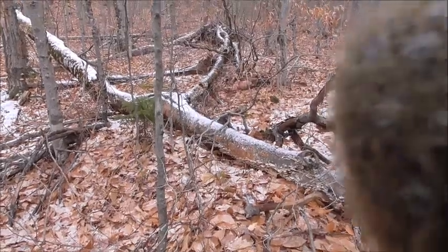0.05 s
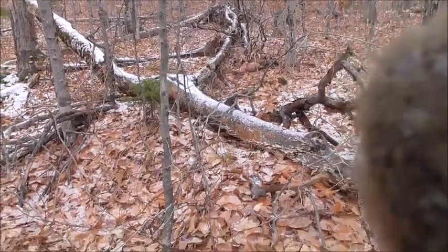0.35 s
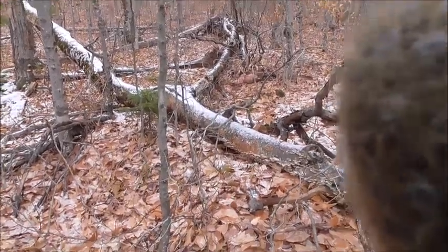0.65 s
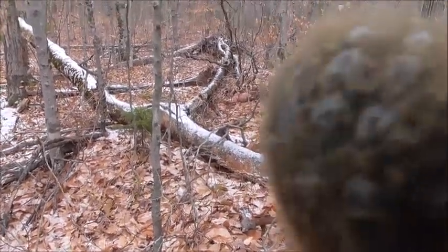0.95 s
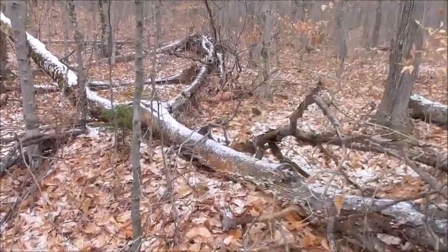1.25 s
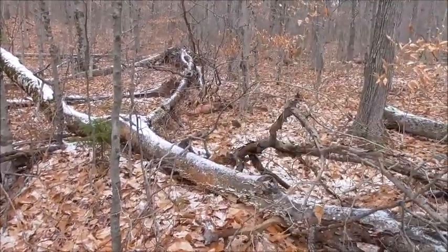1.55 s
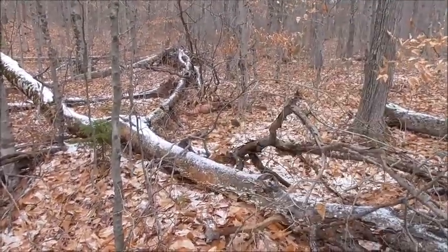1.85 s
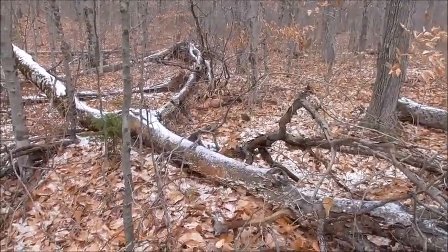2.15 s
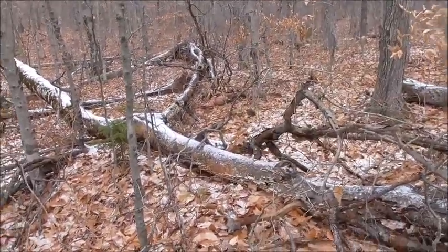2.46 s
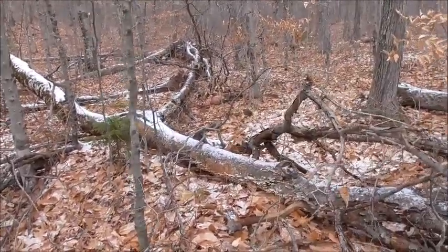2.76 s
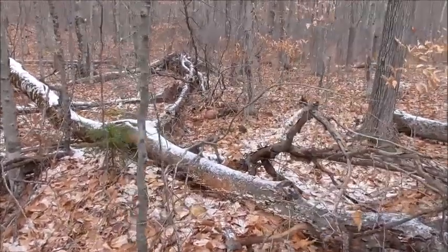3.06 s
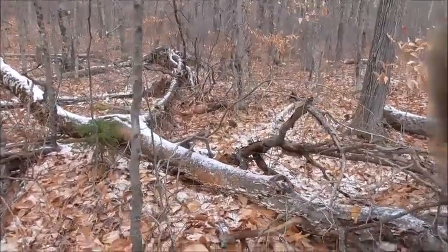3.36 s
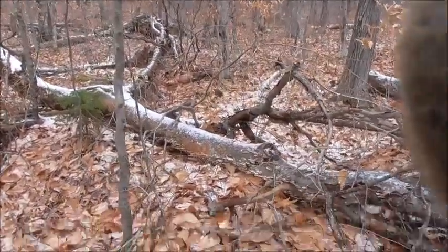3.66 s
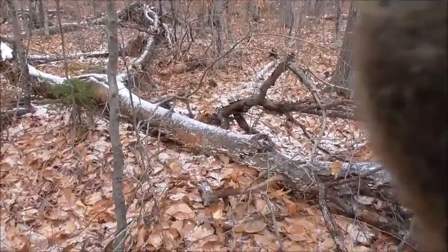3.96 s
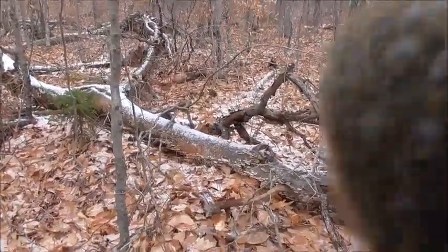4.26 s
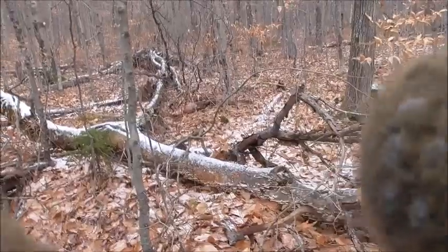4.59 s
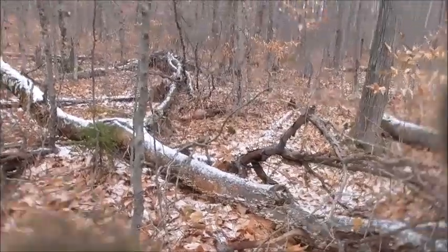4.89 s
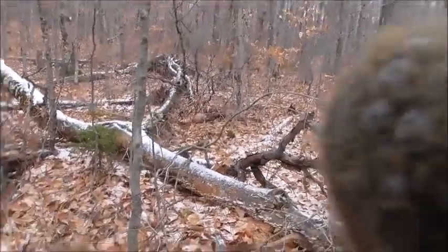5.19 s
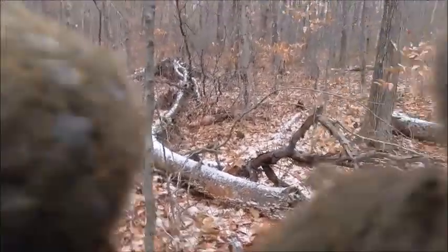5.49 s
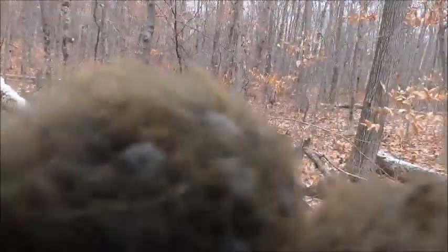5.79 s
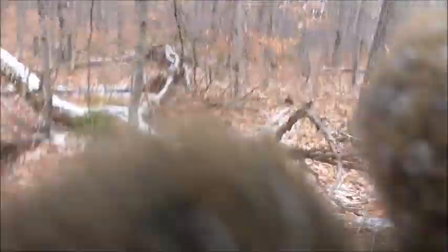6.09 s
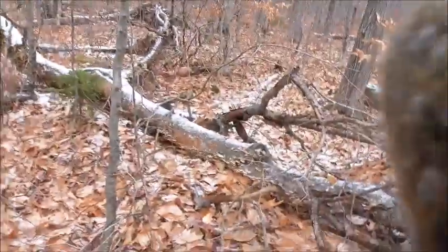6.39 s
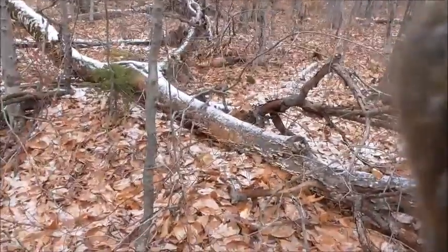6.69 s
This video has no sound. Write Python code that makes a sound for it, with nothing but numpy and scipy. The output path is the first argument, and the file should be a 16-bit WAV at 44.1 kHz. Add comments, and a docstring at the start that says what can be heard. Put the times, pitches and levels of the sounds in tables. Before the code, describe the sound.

A knitted glove and sleeve rub directly on a camera's microphones, shifting between left and right, over a faint, steady murmur of air in still woods. Soft brushes and tiny ticks open, with a brief hissy swish at about 0.9 seconds and a scuff with crisp ticks around 1.3 to 1.5 seconds. After a quieter stretch, a sharp scrape on the left and a click arrive at 3 seconds. Low, muffled rubbing follows, with a dull knock at 4 seconds. From about 4.3 seconds the handling becomes louder and nearly continuous, with rasping strokes of yarn and a hollow rumble. A bright snap and a hard knock on the housing come at around 5.6 seconds. Another strong scuff with a bump follows near 6.2 seconds, then the rubbing eases to light brushing and a last tick just before 7 seconds.

```python
"""Glove on a camera in a winter wood

A knitted glove and sleeve keep brushing a camera carried through still woods, right at its microphones.
Sliding cloth hisses; where it presses on the housing it scrapes and rumbles, pushing the two microphone
ports against each other. Snagged fibres tick, the housing takes a few knocks, and distant air murmurs."""
import sys
import numpy as np
from scipy import signal
from scipy.fft import rfft, irfft, next_fast_len
from scipy.io import wavfile
from scipy.ndimage import uniform_filter1d, map_coordinates

SR = 44100
rng = np.random.default_rng(int(sys.argv[2]) if len(sys.argv) > 2 else 0)


def int16_out(signal):
    """Quantize to a 16-bit WAV file."""
    q = np.round(np.clip(np.atleast_2d(signal).T, -1, 1) * 32767)
    wavfile.write(sys.argv[1], SR, q.astype(np.int16))


N = 301540


def amp(db):
    """Decibels to gain."""
    return 10 ** (np.asarray(db) / 20)


def unit(x):
    """x at rms 1."""
    return x / np.sqrt(np.mean(x ** 2) + 1e-20)


def along(points, hz):
    """(frequency, value) points read on a log axis."""
    freqs, values = np.transpose(points)
    return np.interp(np.log(hz + 1), np.log(freqs + 1), values)


def per_sample(times, values):
    """Join timed values into one value per sample."""
    return np.interp(np.arange(N) / SR, times, values)


def wobble(rate):
    """A smooth random curve, rate knots a second."""
    t = np.arange(0, N / SR, .001)
    knots = rng.standard_normal(int(N * rate / SR) + 4)
    return per_sample(t, map_coordinates(knots, [t * rate]))


def filtered(x, response):
    """x shaped by a gain that depends on frequency."""
    n = x.shape[-1]
    padded = next_fast_len(n + 8192)
    return irfft(rfft(x, padded) * response(np.fft.rfftfreq(padded, 1 / SR)), padded)[..., :n]


def panned(pan_db):
    """Left and right gains of constant power; positive is toward the left microphone."""
    gains = amp(np.array([pan_db, -pan_db]).reshape(2, -1) / 2)
    return gains / np.sqrt(np.mean(gains ** 2, axis=0))


def ports(pair, spectrum, correlation):
    """Two unrelated signals become a coloured stereo pair at the microphone ports, its mid at rms 1."""
    def response(hz):
        angle = np.arccos(np.clip(along(correlation, hz), -1, 1)) / 2
        return amp(along(spectrum, hz)) * [np.cos(angle), np.sin(angle)]
    mid, side = filtered(pair, response)
    return np.array([mid + side, mid - side]) / np.std(mid)


def patchy(pair, depth_db):
    """The colour drifts in patches as folds of cloth open and close small cavities."""
    spectra = signal.stft(pair, nperseg=512)[2]
    bands = uniform_filter1d(rng.standard_normal(spectra.shape), size=7, axis=1)
    patches = unit(uniform_filter1d(bands, size=12, axis=2))
    return signal.istft(spectra * amp(depth_db * patches), nperseg=512)[1][:, :N]


def slips(rate, spread_db):
    """Fibres catch and let go: random impulses of uneven size, rate a second at each port."""
    chance = np.clip(rate / SR, 1e-4, 1)
    fired = rng.random((2, N)) < chance
    sizes = rng.standard_normal((2, N)) * amp(spread_db * rng.standard_normal((2, N)))
    return unit(fired * sizes / np.sqrt(chance))


def add(track, start_s, sound):
    """Mix a sound in at start_s."""
    part = track[:, round(start_s * SR):][:, :sound.shape[1]]
    part += sound[:, :part.shape[1]]


# Air far off among the trees: (frequency [Hz], relative level [dB])
AIR_SPECTRUM = [(12, -60), (20, -32), (107, -9.5), (142, -5), (241, 0.5), (337, -4.5), (367, -5),
                (410, -6.5), (590, -7.5), (1660, -28), (1910, -35.5), (4060, -31.5), (6720, -37),
                (9950, -34), (16000, -60)]
# How alike it reaches the two microphones: (frequency [Hz], correlation [-1..1])
AIR_CORRELATION = [(50, 0.72), (200, 1), (700, 1), (1500, 0.62), (4000, 0.92), (12000, .1)]


def distant_air(level_db=-46.5):
    """A steady low murmur from deep in the wood, nearly alike at both microphones."""
    drift_db = .4 * wobble(3)
    murmur = ports(rng.standard_normal((2, N)), AIR_SPECTRUM, AIR_CORRELATION)
    return murmur * amp(level_db + drift_db) * panned(-2.0)


# Resonances rung by knocks on the housing that holds the microphones:
# (time [s], level [dB], pitch [Hz], t60 [s], left over right [dB])
KNOCK_RESONANCES = [(.945, -27, 175, 0.03, -20), (1.338, -27.5, 252, 0.037, -4),
                    (3.045, -21, 535, 0.025, -1), (3.045, -37.5, 2130, .023, 5),
                    (3.527, -31, 355, 0.093, -13), (3.622, -25, 310, 0.075, -17),
                    (3.982, -12, 195, 0.024, -4), (3.983, -20.5, 566, 0.015, -7),
                    (4.487, -20.5, 237, 0.037, 1), (5.6378, -4, 930, .016, -4.5),
                    (5.6442, -8, 865, 0.02, 1), (5.652, -23.5, 813, 0.071, -8),
                    (5.286, -20.5, 97, 0.044, -4), (6.198, -15, 84, 0.047, -14),
                    (6.216, -13.5, 151, 0.034, -13), (6.2705, -3, 218, 0.016, 14)]


def knocks(rise_cycles=0.57, roughness=0.17, port_phase_rad=1.63):
    """Each row rings one damped resonance; some knocks sound a low and a higher one together."""
    track, t = np.zeros((2, N)), np.arange(SR // 10) / SR
    # the pitch is high for a hard contact, low through the padded glove
    for start_s, db, hz, t60, pan_db in KNOCK_RESONANCES:
        grit = unit(filtered(rng.standard_normal((2, len(t))), lambda f: 1 / (1 + (f / (2 * hz)) ** 2)))
        envelope = (1 - np.exp(-t * hz / rise_cycles)) * amp(-60 * t / t60)
        tone = np.sin(2 * np.pi * hz * t + np.array([[0], [port_phase_rad]]))
        # little sounds below the resonance, so each knock starts cleanly
        low_cut = signal.butter(2, 0.54 * hz, "high", fs=SR, output="sos")
        ring = signal.sosfilt(low_cut, envelope * (tone + roughness * grit))
        add(track, start_s, amp(db) * ring * panned(pan_db))
    return track


# Fibres snagging right by the microphones:
# (time [s], level [dB], tilt above 3 kHz [dB/octave], left over right [dB])
SNAGS = [(.211, -25, 17, -3), (0.237, -22, 14, -6), (0.676, -31, 1, -2), (1.326, -16, 19, -5),
         (1.369, -15, 8, -2), (1.454, -12.5, 12, -9), (2.412, -30, -1, 4), (2.604, -27, 3, 4),
         (2.807, -27, -1, 2), (2.921, -19, -4, 7), (3.045, -8.5, 0, -1), (3.150, -22.5, -7, -2),
         (3.192, -27, -2, -2), (3.377, -25.5, 2, -6), (3.841, -25.5, 9, -9), (3.907, -29, -4, -4),
         (5.571, -3.5, 14, -4), (5.575, -6.5, 8, -5), (6.216, -17, -29, 0), (6.495, -26, 15, 2),
         (6.715, -16, -2.5, -2)]
# The snap, and the housing's answer to it: (frequency [Hz], relative level [dB])
SNAP_SPECTRUM = [(300, 0), (1500, -17), (2800, -9), (4200, 4), (6000, -2.5), (8000, 0), (10000, 2.5),
                 (13000, -5.5), (16000, -21)]
BODY_SPECTRUM = [(120, -28), (300, 2), (550, -15), (950, 6), (1500, -19), (2200, -5), (3000, -15),
                 (8000, -24)]
# How alike a snag reaches the two microphones: (frequency [Hz], correlation [-1..1])
SNAG_CORRELATION = [(300, .4), (2000, .3), (10000, 0.11)]


def snag_ticks(snap_t60=.007, body_t60=0.027, crest_db=8):
    """A snag lets go with a bright snap; the housing answers lower and a little longer."""
    track, t = np.zeros((2, N)), np.arange(SR // 10) / SR
    attack = 1 - np.exp(-t / .0003)

    def burst(spectrum, t60):
        return ports(rng.standard_normal((2, len(t))), spectrum, SNAG_CORRELATION) * amp(-60 * t / t60)
    for start_s, db, tilt, pan_db in SNAGS:
        body_db = -14 - 0.46 * tilt  # a brighter snap stirs the housing less
        tilted = [(hz, level + tilt * np.log2(max(hz, 3000))) for hz, level in SNAP_SPECTRUM]
        tick = burst(tilted, snap_t60) + amp(body_db) * burst(BODY_SPECTRUM, body_t60)
        add(track, start_s, amp(db - crest_db) * attack * tick * panned(pan_db))
    return track


# Air pumped straight into the ports: (frequency [Hz], relative level [dB])
RUMBLE_SPECTRUM = [(15, -23), (35, -17), (70, 10), (120, 5), (220, -8), (500, -29.5)]
# Contact mostly drives the two microphones in opposition: (frequency [Hz], correlation [-1..1])
CONTACT_CORRELATION = [(50, 0.47), (150, -0.76), (350, -0.78), (700, -0.49), (1400, -0.2), (3000, 0.11),
                       (12000, -0.99)]


def grip_rumble(drag_db, pan_db):
    """The press of the hand pumps air at the ports, in soft lumps."""
    lumps = amp(1.8 * np.array([wobble(22), wobble(24)]))
    rumble = ports(rng.standard_normal((2, N)), RUMBLE_SPECTRUM, CONTACT_CORRELATION)
    return rumble * lumps * amp(1.13 * (drag_db + 35) - 58) * panned(pan_db)


# The hollow shell around the microphones: (frequency [Hz], relative level [dB])
SHELL_SPECTRUM = [(30, -26), (70, -24), (130, -2.5), (220, 2.5), (330, 1.5), (480, 2), (650, -7),
                  (1000, -24.5), (3000, -66)]


def glove_drag(drag_db, pan_db):
    """Through its padding the glove stirs the low, hollow resonance of the shell."""
    friction = patchy(slips(2500, spread_db=0.5), depth_db=2.0)
    return ports(friction, SHELL_SPECTRUM, CONTACT_CORRELATION) * amp(drag_db - 7) * panned(pan_db)


# Yarn scraping, and biting, on the housing itself: (frequency [Hz], relative level [dB])
SCRAPE_SPECTRUM = [(200, -15), (500, -5.5), (800, 1.5), (1150, -2), (1700, -14), (2300, -13), (2900, -21),
                   (4000, -12.5), (6000, -32.5), (9000, -42), (16000, -40)]
RASP_SPECTRUM = [(600, -18), (1500, 0), (2200, -9.5), (2900, -3.5), (4000, -2.5), (5200, 0.5), (6200, -12),
                 (9000, -12), (13000, -8), (16000, -41)]


def yarn_scrape(scrape_db, pan_db):
    """Coarse yarn drags over the housing in small jerks; under a hard press it bites and rasps."""
    jerks = slips(6000 * amp(.3 * (scrape_db + 40)), spread_db=-1.5)
    scrape = ports(patchy(jerks, depth_db=2.14), SCRAPE_SPECTRUM, CONTACT_CORRELATION)
    rasp = np.sqrt(2) * ports(slips(4000, spread_db=-2), RASP_SPECTRUM, FIBRE_CORRELATION)
    bite = amp(0.86 * (scrape_db + 29) - 5.5)
    blend = (scrape + bite * rasp) / np.sqrt(1 + bite ** 2)
    return blend * amp(scrape_db - 3 + 0.66 * wobble(55)) * panned(pan_db)


# Cloth passing over the ports, and its finest fibres: (frequency [Hz], relative level [dB])
HISS_SPECTRUM = [(500, -41), (1500, -10), (2800, -12.5), (4300, -3), (6100, -7.5), (7500, 0), (9500, 2),
                 (11000, -1.5), (13000, -10), (16000, -9.5)]
SHEEN_SPECTRUM = [(7000, -24), (10500, 1), (12500, 2), (16000, -19)]
# Fibre noise is barely alike at the two microphones: (frequency [Hz], correlation [-1..1])
FIBRE_CORRELATION = [(1000, 0.14), (4000, 0.16), (12000, 0.049)]


def cloth_hiss(hiss_db, pan_db, scrape_db):
    """Faster sliding frees more fibres a second, so the hiss gets louder and smoother."""
    rate = 11000 * amp(.4 * (hiss_db + 42.5))
    fibres = patchy(slips(rate, spread_db=0), depth_db=1.4)
    hiss = np.sqrt(2) * ports(fibres, HISS_SPECTRUM, FIBRE_CORRELATION) * panned(1.5)
    # the finest fibres hiss highest, pass nearer to the right port and stand out under a light touch
    sheen = ports(slips(rate, spread_db=3.5), SHEEN_SPECTRUM, FIBRE_CORRELATION) * panned(-12)
    sheen_db = -10 + 0.29 * (hiss_db - scrape_db) - 0.79 * pan_db
    return (hiss + amp(sheen_db) * sheen) * amp(hiss_db - 3.5 + 1.17 * wobble(70)) * panned(pan_db)


def cloth_crackle(hiss_db, pan_db, flicks_per_s=120, flick_t60=.0018):
    """Single stiff fibres flick the housing, more strongly the harder the cloth slides."""
    t = np.arange(SR // 100) / SR
    flick = rng.standard_normal((2, len(t))) * amp(-60 * t / flick_t60)
    flicks = signal.fftconvolve(slips(flicks_per_s, spread_db=-1.5), flick, axes=1)[:, :N]
    level_db = -55 + .75 * (hiss_db + 41)
    return ports(flicks, HISS_SPECTRUM, FIBRE_CORRELATION) * amp(level_db) * panned(pan_db - 9)


# Strokes of glove and sleeve across the camera, touching it; strengths are relative: (fullest at [s],
# rise [s], fall [s], hiss [dB], scrape [dB], low drag [dB], left over right [dB])
CLOTH_STROKES = [(.14, .05, .04, -53.5, -64, -50, -7), (.225, 0.032, 0.077, -50.5, -59, -48, -10),
                 (.30, 0.067, .06, -54, -64, -49, -11), (.82, 0.056, 0.15, -53, -64, -54, -6),
                 (0.934, 0.032, 0.045, -39.5, -49, -42, -4), (1.21, 0.12, .10, -47, -50.5, -55.5, -8),
                 (1.35, 0.051, 0.041, -43.5, -47, -37, -11), (1.45, 0.067, .06, -51, -55, -54, -5),
                 (1.65, 0.067, 0.044, -49.5, -54, -55, -7), (1.92, 0.04, 0.039, -55, -63, -55, -3),
                 (2.08, 0.096, 0.07, -58.5, -74, -62, -4), (2.36, .14, 0.28, -58.5, -55.5, -67, 5),
                 (2.85, 0.053, .035, -49.5, -47.5, -67, -1), (2.963, 0.038, 0.039, -33, -37.5, -35.5, 12),
                 (3.0, 0.063, .05, -48.5, -41, -35.5, 4), (3.19, 0.2, 0.23, -57.5, -52, -45, -4),
                 (3.32, 0.048, 0.16, -55.5, -57, -46.5, -1), (3.53, 0.064, 0.035, -52.5, -51, -37.5, -9.5),
                 (3.62, 0.034, 0.034, -55.5, -51, -37.5, -12), (3.71, 0.073, 0.15, -53, -51.5, -45, -4),
                 (3.989, 0.078, 0.088, -49, -47, -41.5, -4), (4.231, 0.065, 0.045, -49.5, -43, -34.5, -7.5),
                 (4.391, 0.057, 0.11, -37.5, -36.5, -33.5, -8.5),
                 (4.511, 0.049, 0.036, -39, -34, -30.5, -14), (4.605, 0.078, 0.069, -35.5, -30, -27.5, 3),
                 (4.70, 0.047, 0.17, -46.5, -38.5, -36.5, 5), (4.815, .06, 0.046, -43, -34.5, -33, 6.5),
                 (4.891, .035, 0.028, -45, -37, -31, -9), (5.004, 0.064, 0.089, -39.5, -35, -39, -3.5),
                 (5.13, 0.16, 0.12, -47, -43.5, -40.5, 6.5), (5.288, 0.036, 0.074, -43.5, -36.5, -33, 1.5),
                 (5.502, 0.055, 0.04, -34, -35.5, -31.5, 7), (5.56, 0.05, 0.059, -40, -40.5, -36, -6.5),
                 (5.646, 0.029, .035, -39.5, -34, -29, 1.5), (5.81, 0.21, 0.16, -56, -47.5, -40, 5),
                 (5.90, 0.097, 0.066, -46.5, -45, -40.5, 0), (6.01, 0.057, 0.13, -51.5, -49.5, -41, 8.5),
                 (6.216, 0.053, 0.049, -32, -34, -33, -3), (6.256, 0.025, 0.013, -31, -29, -30, 7.5),
                 (6.34, 0.048, 0.045, -45, -46.5, -36.5, -10), (6.42, 0.18, 0.083, -51, -56, -65, -6),
                 (6.503, 0.021, .025, -48, -55, -51, 2), (6.74, 0.17, 0.2, -57, -52.5, -65, -1)]


def strokes(layer, rest_db, pan_share, slope_db=14.5, rounding=0.52):
    """Strokes swell and fade over cloth that never lies still: a layer's strength and pan, in dB."""
    fullest_s, rise, fall, hiss, scrape, drag, pan_db = np.transpose(CLOTH_STROKES)
    strength_db = {"hiss": hiss, "scrape": scrape, "drag": drag}[layer]
    t = np.arange(0, N / SR, .002)
    since = t[:, None] - fullest_s
    away = since / np.where(since < 0, rise, fall)
    fade_db = slope_db * (np.hypot(away, rounding) - rounding)  # round top, straight flanks
    power = amp(strength_db - fade_db) ** 2
    light_touch = amp(rest_db - 2.5 * wobble(18)[(t * SR).astype(int)])
    total = power.sum(axis=1) + light_touch ** 2
    return per_sample(t, 10 * np.log10(total)), per_sample(t, pan_share * (power @ pan_db) / total)


def scene():
    """Handling right at the microphones, over the distant quiet of the wood."""
    hiss_db, hiss_pan = strokes("hiss", rest_db=-63, pan_share=0.34)
    scrape_db, scrape_pan = strokes("scrape", rest_db=-66, pan_share=0.47)
    drag_db, drag_pan = strokes("drag", rest_db=-62.5, pan_share=0.65)
    cloth = cloth_hiss(hiss_db, hiss_pan, scrape_db) + cloth_crackle(hiss_db, hiss_pan)
    yarn = yarn_scrape(scrape_db, scrape_pan)
    hand = grip_rumble(drag_db, drag_pan) + glove_drag(drag_db, drag_pan)
    return cloth + yarn + hand + snag_ticks() + knocks() + distant_air()


def record(dry):
    """The camera keeps nothing above its band limit."""
    return filtered(dry, lambda hz: hz < 16100)


dry = scene()
out = record(dry)
int16_out(out)
```